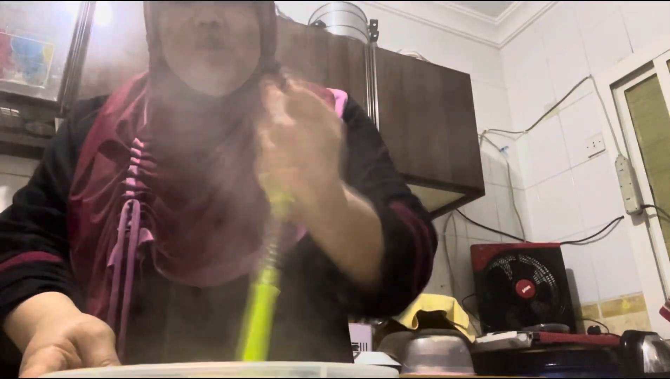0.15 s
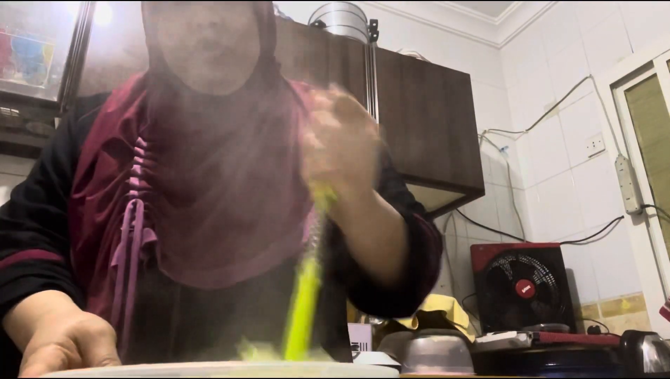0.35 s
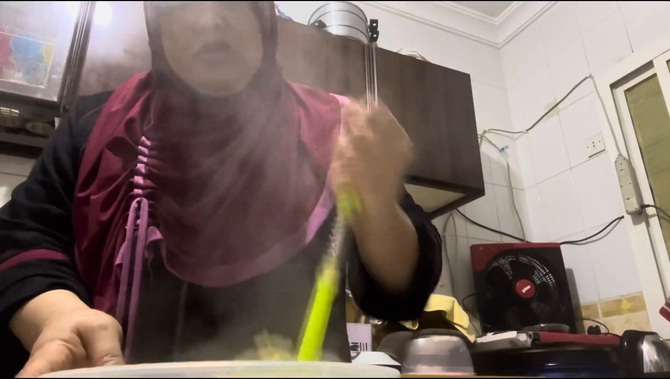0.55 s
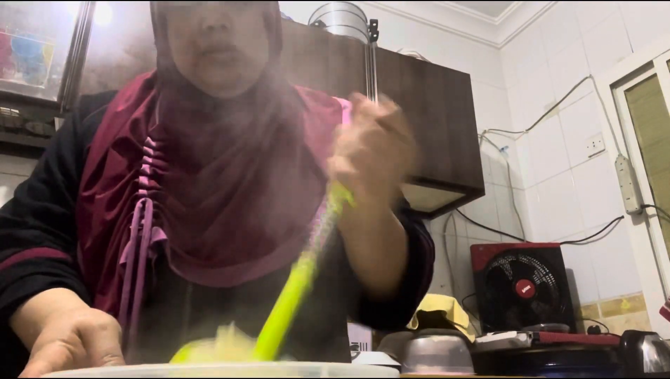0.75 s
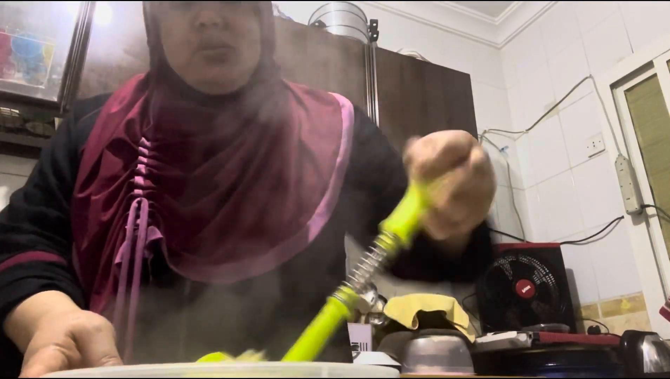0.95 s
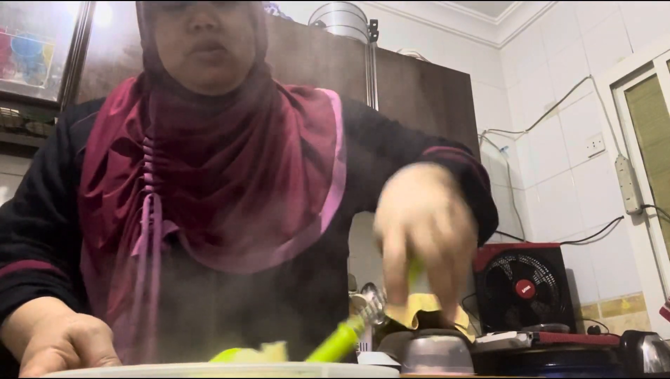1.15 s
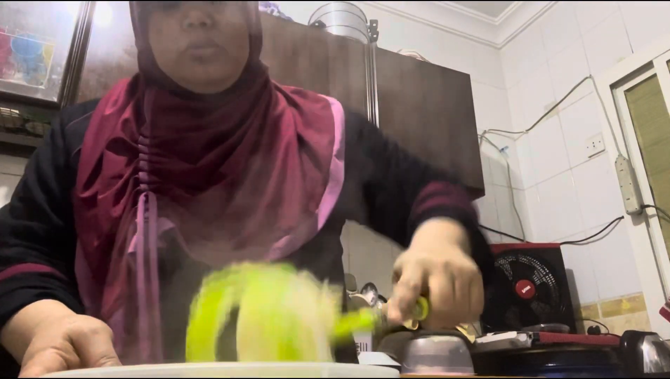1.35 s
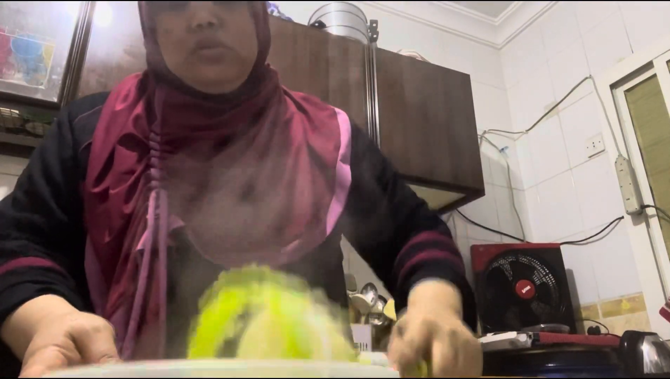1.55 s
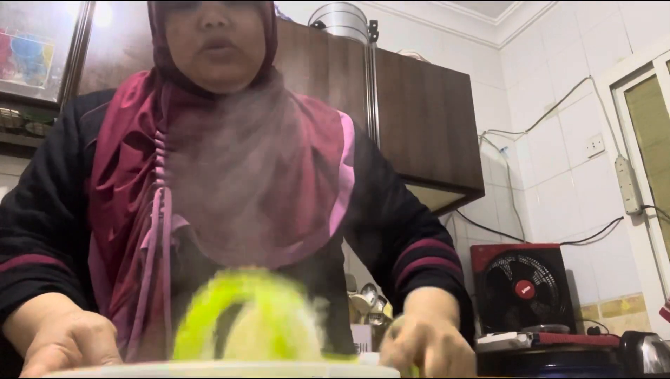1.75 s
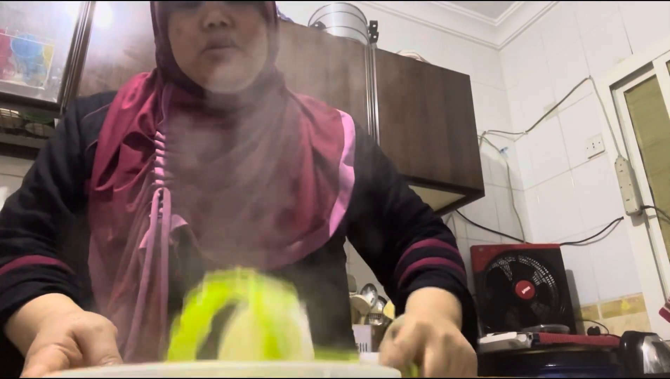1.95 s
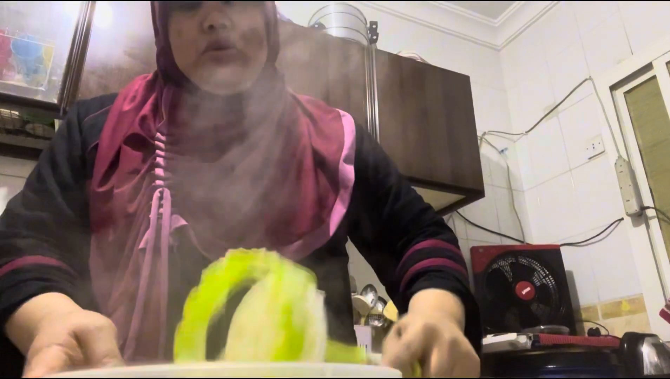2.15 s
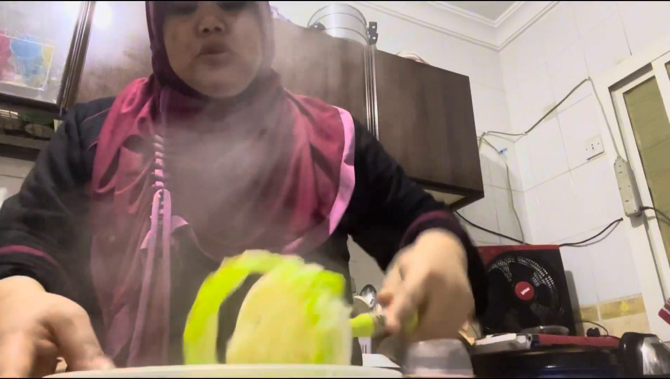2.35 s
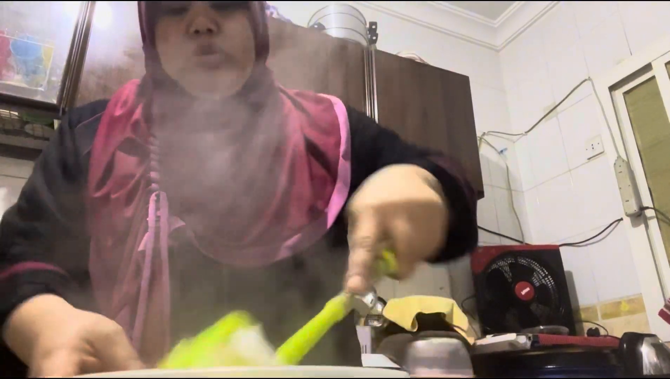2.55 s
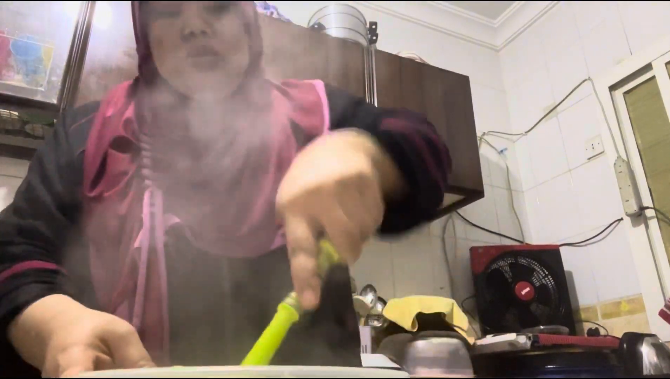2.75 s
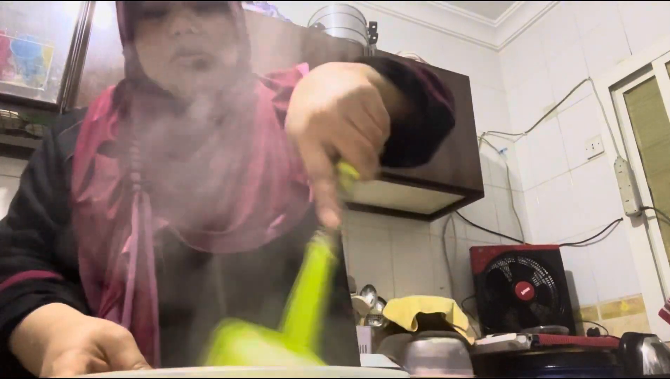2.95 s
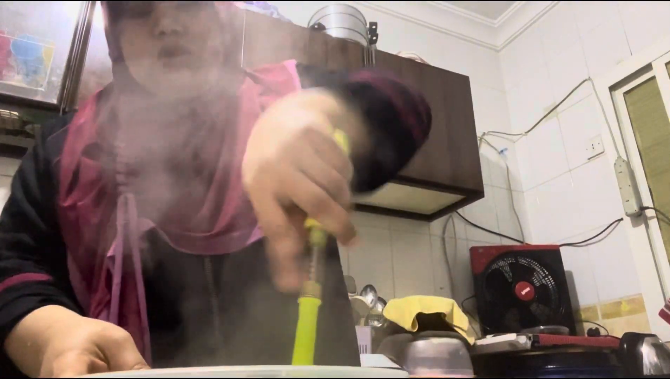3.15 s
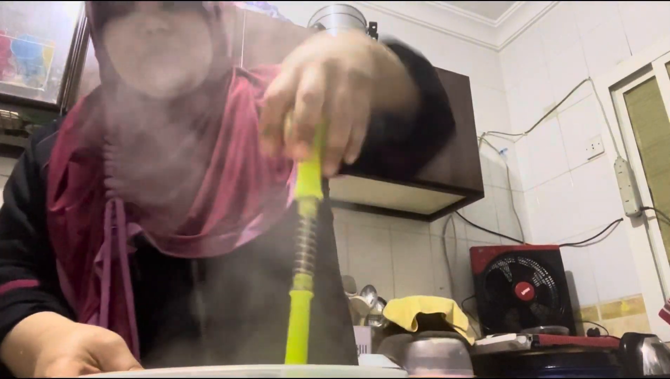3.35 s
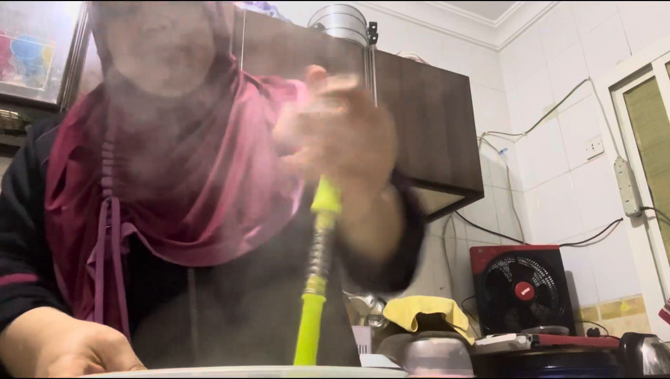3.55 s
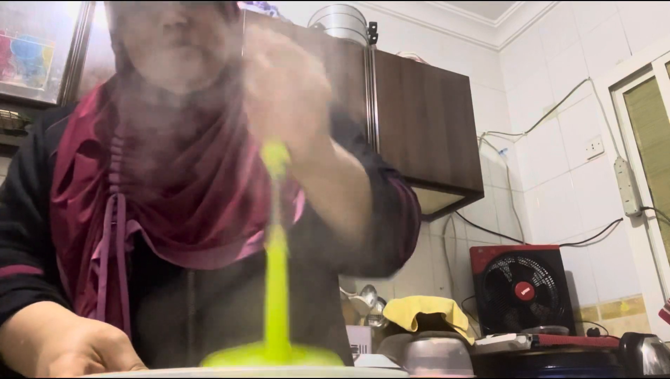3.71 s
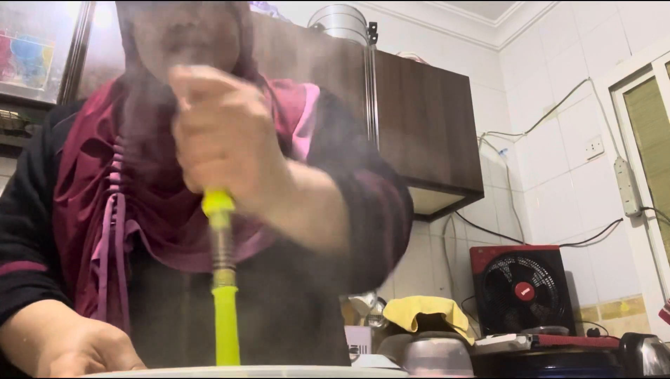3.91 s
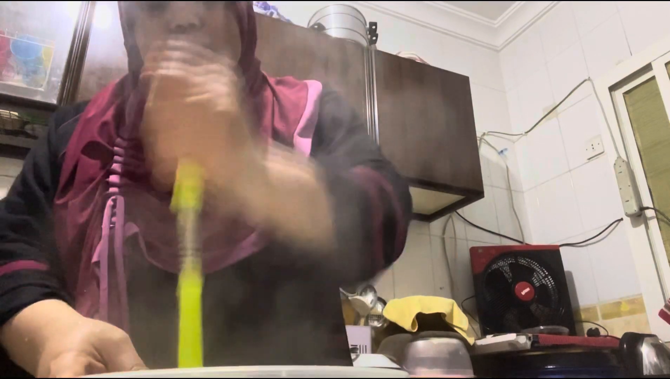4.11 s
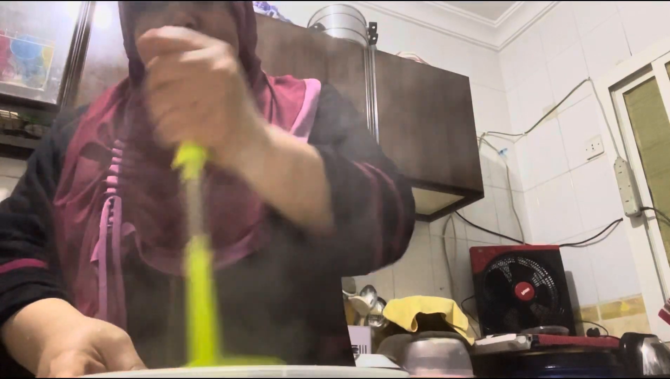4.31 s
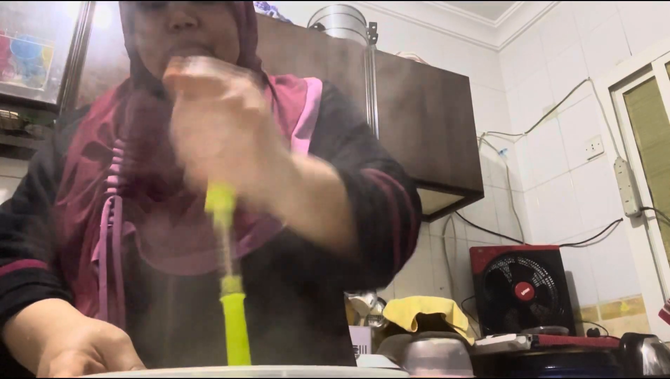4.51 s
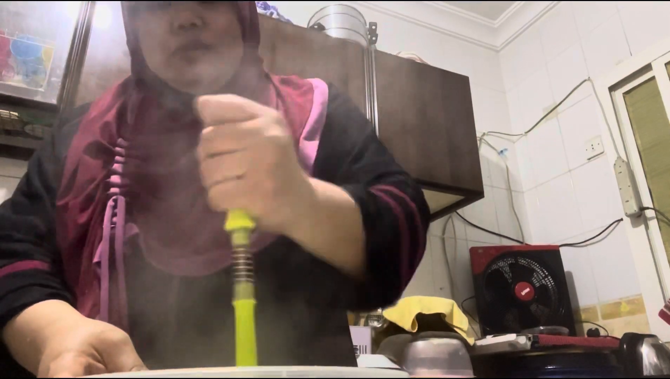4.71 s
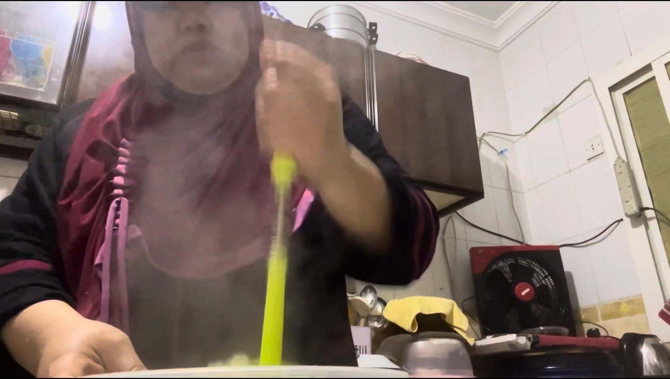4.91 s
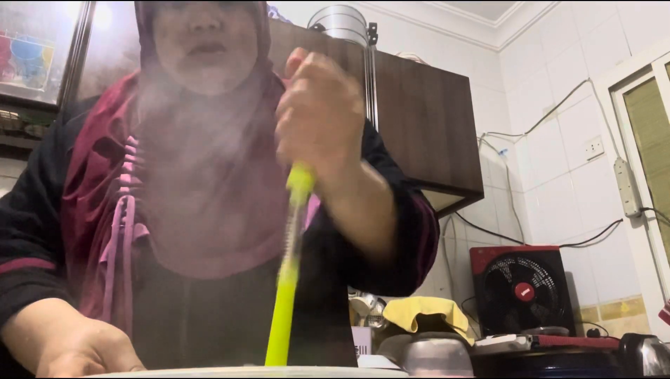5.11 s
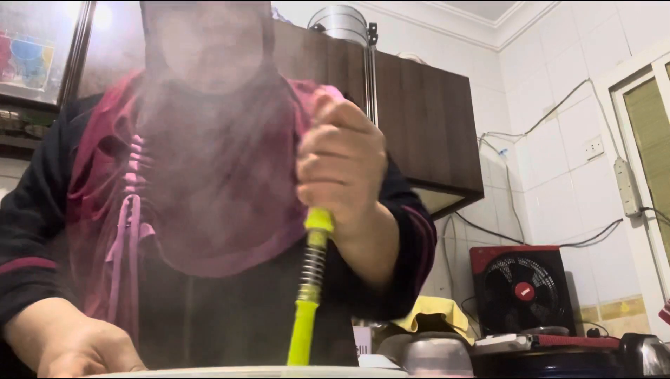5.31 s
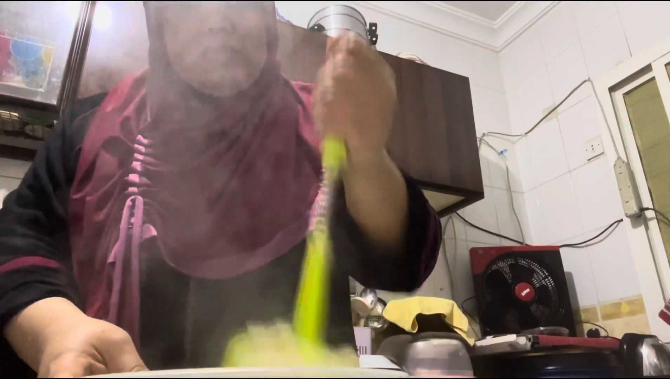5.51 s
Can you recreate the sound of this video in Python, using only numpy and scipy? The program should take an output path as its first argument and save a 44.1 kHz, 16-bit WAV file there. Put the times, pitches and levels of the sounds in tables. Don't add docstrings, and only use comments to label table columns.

```python
import sys
import numpy as np
from scipy import signal
from scipy.fft import rfft, irfft
from scipy.io import wavfile

SR = 44100
rng = np.random.default_rng(int(sys.argv[2]) if len(sys.argv) > 2 else 0)


def ratio(d):
    e = np.asarray(d, float) / 20
    return 10 ** e


def wrap_up_sound(samples):
    columns = np.atleast_2d(samples).T
    tamed = np.clip(columns, -1, 1)
    steps = np.round(tamed * 32767).astype(np.int16)
    wavfile.write(sys.argv[1], SR, steps)


N = 245637

# multiple, left_db, right_db, left_lead_rad
HUM_PARTIALS = [(4, -61, -61, 0), (5, -61, -58, 0), (7, -58, -52, 1.8), (9, -65, -63, -1.5),
                (10, -52, -48, 2.9), (11, -59, -62, -2.3), (12, -66, -69, 2.9), (13, -64, -67, 2.7),
                (14, -60, -63, 2.4), (15, -68, -67, 3.0), (16, -73, -71, 3.0)]
# pitch_hz, level_db (per Hz)
AIR_SPECTRUM = [(25, -31), (40, -5), (65, 2.5), (100, -7), (170, -6), (260, -13), (400, -7), (630, -17),
                (1000, -20.5), (1500, -23.5), (2600, -21.5), (4500, -22), (7800, -20), (15500, -25)]
# pitch_hz, likeness (-1 to 1)
AIR_LIKENESS = [(60, 0.54), (130, 0.93), (290, 0.65), (640, -0.48), (1000, -0.24), (1800, -0.22),
                (3000, 0.2), (4500, 0.047), (7500, -0.034), (13000, 0.39), (15700, 0.057)]
# pitch_hz, t60_s
ROOM_DECAY = [(100, 0.53), (500, 0.16), (2000, 0.83), (8000, 0.24), (16000, 0.15)]
# pitch_hz, level_db
ROOM_LEVEL = [(100, -4), (400, 10), (900, -36), (1500, -15.5), (2500, -16), (4000, -23), (7500, -20.5),
              (11000, -30), (16000, -26)]
# pitch_hz, left_lead_rad
PORT_PHASE = [(3500, 0), (5000, 2.3), (8000, 1.65), (15500, 1.2)]

# pitch_hz, width_hz, level_db
TABLE_MODES = [(44.5, 14, 2), (69, 14, -7), (96.7, 16, 1.5), (133.5, 21, -5), (186, 15, -5.5),
               (339, 42, -12.5)]
# start_s, peak_db, pitch_hz, t60_s, left_minus_right_db
PUSHES = [(0.1995, -26.0, 71.7, 0.35, 10.5), (0.2171, -22.5, 56.2, 0.16, -10.5),
          (0.2229, -25.4, 91.5, 0.16, -9.7), (0.5838, -30.4, 71.7, 0.35, 10.5),
          (0.5838, -23.1, 87.2, 0.35, -3.9), (2.6338, -30.6, 71.7, 0.35, -10.5),
          (2.6576, -23.0, 91.5, 0.35, -4.2), (2.6605, -29.4, 100.9, 0.35, -6.3),
          (2.6671, -26.0, 111.3, 0.35, 4.4), (3.0552, -14.4, 149.2, 0.05, -2.5),
          (3.0605, -18.5, 91.5, 0.24, -4.7), (3.0757, -27.2, 106.0, 0.35, -3.1),
          (3.8752, -29.1, 56.2, 0.35, -6.5), (3.9924, -20.1, 71.7, 0.16, -1.5),
          (3.9952, -29.8, 96.1, 0.35, -7.9), (4.0081, -27.0, 50.9, 0.35, -2.4),
          (4.1514, -30.3, 122.7, 0.35, 9.4), (4.1819, -21.3, 48.5, 0.35, 0.3),
          (4.2129, -21.1, 71.7, 0.11, 2.6), (4.309, -29.2, 100.9, 0.35, -4.7),
          (4.4643, -25.7, 46.2, 0.24, -0.3), (4.569, -24.0, 91.5, 0.24, -5.9),
          (4.5833, -27.7, 71.7, 0.35, 10.5), (4.59, -25.3, 71.7, 0.16, -10.5),
          (4.7395, -24.1, 91.5, 0.24, -3.6), (4.7567, -22.3, 106.0, 0.11, 5.5),
          (4.76, -12.2, 68.3, 0.075, -10.5), (4.7786, -21.8, 53.5, 0.35, 1.0),
          (4.8271, -23.9, 68.3, 0.35, 10.5), (4.8495, -26.2, 68.3, 0.35, -10.5),
          (4.8624, -23.4, 87.2, 0.24, -1.8), (4.9505, -26.9, 50.9, 0.35, -1.9),
          (5.1343, -22.0, 91.5, 0.11, -5.1), (5.331, -19.7, 53.5, 0.11, -9.3),
          (5.3529, -17.4, 96.1, 0.075, -0.7), (5.3919, -30.0, 75.3, 0.35, 10.5),
          (5.4157, -17.4, 116.9, 0.11, 1.9), (5.4381, -16.8, 100.9, 0.16, -2.3)]
# start_s, peak_db, pitch_hz, t60_s, left_minus_right_db
BOWL_LANDINGS = [(1.5814, -14.6, 122.7, 0.35, -1.8), (1.5886, -15.9, 61.9, 0.16, 10.5),
                 (1.591, -17.9, 96.1, 0.35, -6.5), (1.6005, -9.8, 156.7, 0.075, 1.3),
                 (1.6105, -6.5, 59.0, 0.11, -7.6), (1.6605, -21.8, 83.0, 0.35, -2.7),
                 (1.779, -17.5, 142.1, 0.24, -5.9), (1.7824, -13.5, 53.5, 0.16, 5.7),
                 (1.7833, -21.6, 83.0, 0.35, -10.5), (1.8033, -10.5, 79.1, 0.05, 10.5),
                 (1.8062, -14.9, 50.9, 0.075, -10.5), (1.8276, -2.0, 91.5, 0.05, -8.1),
                 (1.8376, -17.8, 100.9, 0.24, 0.7), (1.9705, -17.4, 135.3, 0.11, -10.5),
                 (1.9757, -14.4, 56.2, 0.16, 8.2), (1.9962, -20.7, 44.0, 0.16, -10.5),
                 (2.0033, -21.2, 106.0, 0.35, 0.7), (2.0195, -3.9, 91.5, 0.05, -10.2),
                 (2.1514, -16.8, 128.9, 0.16, -10.5), (2.1562, -8.3, 59.0, 0.075, 3.5),
                 (2.1757, -11.1, 65.0, 0.05, 10.5), (2.1805, -20.3, 44.0, 0.35, -5.1),
                 (2.1805, -12.8, 56.2, 0.24, -5.2), (2.1824, -17.5, 200.0, 0.16, 10.5),
                 (2.201, 3.6, 87.2, 0.05, -3.4), (2.2186, -10.8, 75.3, 0.11, 3.5)]
# full_load_s, table_shake_db, wetness_db, build_up_s
PRESS_STROKES = [(0.001, -26.5, -42.5, .011), (0.246, -27, -44, 0.24), (0.44, -32, -54, 0.069),
                 (0.577, -33, -48, 0.0078), (0.74, -33, -52, 0.34), (1.585, -11, -23, 0.017),
                 (1.786, -13, -29, 0.027), (1.977, -15, -30, 0.024), (2.151, -13.5, -24.5, 0.0079),
                 (2.197, -13.5, -31, 0.062), (2.663, -29, -44, 0.048), (2.835, -32, -51, 0.062),
                 (3.056, -24, -40, 0.031), (3.237, -34, -49, 0.032), (3.669, -27.5, -51, 0.14),
                 (3.892, -24, -36.5, 0.05), (4.105, -38, -48, 0.036), (4.255, -43, -43, 0.06),
                 (4.445, -28, -57, 0.054), (4.56, -24.5, -57, 0.033), (4.734, -22.5, -40.5, 0.08),
                 (5.31, -26, -44.5, 0.038), (2.625, -31, -52, 0.02), (4.3, -39, -58, .04),
                 (4.828, -24, -37, 0.09), (5.043, -26, -48, 0.35), (5.415, -20.5, -43.5, 0.14)]
# time_s, table_shake_db
LEANING = [(0, -72), (.8, -48), (1.2, -44), (1.5, -59), (2.5, -38.5), (2.95, -49), (3.4, -59), (3.55, -55),
           (3.85, -47), (4.1, -31.5), (4.4, -32.5), (4.7, -46), (5.2, -33), (5.57, -47)]

# centre_s, level_db (rms), pitch_hz, length_s
MASH_PEELS = [(0.594, -51, 2700, 0.12), (0.715, -48.5, 3300, 0.065), (0.76, -51, 8900, .08),
              (0.838, -51, 3500, 0.095), (0.938, -48, 4110, 0.025), (1.165, -53, 7000, .04),
              (2.58, -53, 8300, .05), (2.915, -46, 7600, 0.022), (3.054, -58, 2620, 0.13),
              (3.59, -50.5, 3770, 0.058), (3.66, -54, 2700, .07), (3.916, -47, 7800, .05),
              (4.44, -50, 3700, 0.018), (5.365, -57, 2600, 0.028)]
# centre_s, level_db (rms), pitch_hz, length_s
HEAD_SCUFFS = [(0.3706, -50, 900, 0.01), (2.619, -44, 1100, 0.0091), (2.627, -41, 700, 0.013),
               (2.668, -43, 1280, 0.011), (3.054, -46, 1300, 0.005), (4.083, -49, 900, 0.0087),
               (4.42, -45, 880, 0.014), (4.443, -44, 1290, 0.017), (4.555, -52, 1330, 0.015),
               (4.708, -50, 1290, .01), (4.729, -42, 1200, 0.012), (4.737, -37, 1020, 0.009),
               (4.25, -52, 1300, .012), (4.29, -45, 1090, .015), (3.888, -28, 1400, 0.0066),
               (4.815, -49, 2900, .008), (4.838, -44, 1500, 0.011), (4.845, -48, 2700, .012),
               (5.051, -44, 2310, .012), (5.125, -46.5, 1200, .007), (5.305, -47, 800, .02),
               (5.33, -44, 453, 0.03), (5.35, -50, 1000, .01), (5.392, -43, 910, 0.013),
               (0.576, -42, 2480, 0.0021), (0.581, -40, 800, 0.0045), (2.193, -31.5, 1700, 0.0056),
               (1.799, -30, 1520, 0.0051), (1.99, -25, 1420, 0.0031), (1.618, -33, 2130, 0.019)]
# start_s, level_db, pitch_hz
CHATTER_TICKS = [(0.263, -42, 3030), (0.536, -41, 2700), (0.573, -29, 900), (0.616, -41, 4260),
                 (1.619, -29, 1960), (1.689, -40, 1460), (1.7, -41, 1510), (1.786, -25, 1770),
                 (1.804, -30, 1380), (1.806, -24, 2280), (1.819, -28, 1550), (1.84, -33, 1680),
                 (1.861, -32, 1810), (1.885, -33, 1810), (1.943, -42, 2150), (1.979, -23, 1770),
                 (1.98, -29, 2800), (1.999, -28, 2220), (1.999, -29, 1380), (2.008, -25, 1870),
                 (2.022, -28, 1460), (2.033, -29, 1640), (2.054, -34, 1810), (2.064, -37, 1820),
                 (2.078, -38, 1770), (2.162, -29, 4010), (2.168, -33, 2740), (2.179, -37, 4090),
                 (2.19, -36, 4180), (2.194, -25, 2860), (2.263, -29, 2200), (2.316, -37, 3010),
                 (2.995, -36, 3100), (3.318, -40, 2890), (3.883, -37, 3100), (3.885, -28, 3870),
                 (3.884, -34, 1560), (3.905, -27, 820), (3.914, -30, 1550), (3.925, -28, 1460),
                 (3.948, -44, 4030), (3.956, -44, 4050), (3.977, -43, 1550), (4.1, -34, 1640),
                 (4.101, -35, 860), (4.247, -41, 2300), (4.551, -34, 1350), (4.776, -40, 1420),
                 (5.347, -44, 2480), (5.35, -46, 4480)]
# start_s, bowl_db, bowl_pitch_hz, handle_db, tick_db
LIGHT_TAPS = [(0.463, -57, 556, -44, -50), (0.483, -59, 501, -42, -44), (0.5741, -33.5, 916, -31.5, -43),
              (2.616, -40, 500, -58, -60), (2.624, -32, 705, -52, -48), (3.077, -36, 590, -52, -50),
              (3.653, -46, 584, -46.5, -48), (3.988, -54, 568, -47, -50), (4.101, -38.5, 860, -39, -39),
              (4.117, -42, 574, -47, -49), (4.147, -35, 790, -43, -50), (4.245, -52, 553, -45, -48),
              (4.264, -44, 810, -48, -57), (4.288, -48, 635, -52, -55), (4.442, -37, 596, -57, -47),
              (4.561, -42, 577, -51, -60), (4.701, -43, 930, -55, -55), (4.734, -37, 680, -42, -51),
              (4.823, -44, 785, -50, -57), (4.839, -39, 700, -48, -42), (5.048, -43, 571, -47, -43),
              (5.099, -35, 744, -49, -58), (5.415, -45, 443, -48, -57), (5.388, -40, 570, -50, -58)]
# start_s, peak_db, first_pitch_hz, t60_s
BOWL_BUMPS = [
    (1.797, -13, 1200, .035),
    (1.9875, -15, 1200, .03),
    (2.193, -8, 900, .04),
    (2.658, -16, 1150, .05),
    (3.0517, -12, 1050, .02),
    (3.0635, -24, 1000, .03),
    (4.735, -25, 1400, .04),
    (5.4145, -17, 850, .05),
]
# start_s, pitch_hz, level_db, t60_s, rise_s
COIL_SLIP = [(3.853, 950, -30, .02, .001), (3.8805, 1250, -15, .018, .002), (3.884, 1490, -11, .022, .003),
             (3.885, 760, -13.5, .028, .002), (3.887, 3900, -21, .006, .0006),
             (3.888, 3100, -26, .006, .0006), (3.888, 2400, -28, .006, .0006),
             (3.888, 6800, -22, .004, .0003), (3.893, 1560, -40, .3, .005), (3.9, 1470, -39, .15, .005),
             (3.884, 200, -24, .04, .002)]

# pitch_hz, level_db, t60_s, pitch_fall
BOWL_MODES = [(391, -8, 0.054, 1.22), (637, 0, 0.014, 0.81)]
HANDLE_MODES = [(1520, 0, .017, .03), (1150, -12, .01, .2), (1950, -9, .012, .05)]
EDGE_MODES = [(2060, -6, 0.0061, 0.14), (2700, -12, 0.0054, 0.029), (3700, 4, 0.0039, 0.32),
              (4020, -21, 0.014, 0.04)]
CRACK_MODES = [(5400, -10, .002, 0), (6900, -4, .0025, 0), (8000, -1, .003, 0), (10100, -2, .0025, 0),
               (11600, -6, .002, 0), (14400, -6, .0028, 0), (12900, -12, .002, 0), (16300, -19, .002, 0)]
# pitch_hz, level_db, t60_s
RATTLE_MODES = [(620, -2, .016), (1000, -5, .012), (1480, 0.5, .014), (2050, -1, .011), (2650, -3, .009),
                (3400, -9, .007)]
# start_s, bowl_wave_db, hollow_ring_db, handle_ring_db, crack_db
RIM_KNOCKS = [
    (1.5784, -7.5, -18.5, -23, -18),
    (1.7744, -12, -29, -19, -12.5),
    (1.9669, -13, -27, -20, -15.5),
    (2.1480, -11.5, -15, -30.5, -11),
]
# bowl_pitch_factor, treble_tilt_db (per half octave above 8 kHz), rattle_db, splash_db
STRIKE_COLOURS = [
    (1.01, -7, -40, -57),
    (0.98, -3, -29.5, -49),
    (0.96, 2, -33.5, -39),
    (1.046, -2, -39, -54),
]
# start_s, pitch_hz, level_db, t60_s
EDGE_CATCH = [
    (2.148, 3220, -17, .011),
    (2.1484, 880, -18, .012),
    (2.149, 1620, -20, .014),
]


def in_time(rows):
    s, *columns = np.transpose(rows)
    return [np.interp(np.arange(N) / SR, s, c) for c in columns]


def at_hz(points, hz):
    points = np.array(points)
    return np.interp(np.log(hz), np.log(points[:, 0]), points[:, 1])


def rms_one(x):
    return x / np.sqrt(np.mean(x ** 2) + 1e-20)


def left_right(mid, side):
    return mid + side * np.array([[1], [-1]])


def band_pass(x, low_hz, high_hz):
    return signal.sosfilt(signal.butter(2, [low_hz, high_hz], "band", fs=SR, output="sos"), x)


def drift(rate):
    r = np.exp(-80 * np.pi * rate / SR)
    slow = signal.lfilter([1], [1, -2 * r, r * r], rng.standard_normal(N // 40 + 2002))[2000:]
    return np.interp(np.arange(N) / 40, np.arange(len(slow)), rms_one(slow))


def grains(per_s, spread_db):
    sizes = ratio(spread_db * np.minimum(rng.exponential(1, (2, N)), 4))
    sizes = sizes * rng.choice([-1, 1], (2, N))
    return sizes * (rng.random((2, N)) < per_s / SR) + 1e-18


def swells(rows, width, per_s, spread_db, side_share):
    out = np.zeros((2, N))
    source = grains(per_s, spread_db)
    for s, db, hz, length_s in rows:
        start, size = int((s - length_s) * SR), int(2 * length_s * SR)
        cavity = band_pass(source[:, start:start + size], hz * (1 - width), hz * (1 + width))
        mid, side = rms_one(cavity)
        out[:, start:start + size] += ratio(db) * np.hanning(size) * left_right(mid, side_share * side)
    return out


def add_mode(out, s, hz, db, t60, fall, rise_s, pan_db=0.):
    start = int(s * SR)
    t = np.arange(min(int(1.2 * t60 * SR) + 64, N - start)) / SR
    phase = 2 * np.pi * hz * (t + fall * 0.0019 * (1 - np.exp(-t / 0.0026)))
    envelope = (1 - np.exp(-t / max(rise_s, 1e-5))) * ratio(-60 * t / t60)
    pan = ratio(np.array([[pan_db], [-pan_db]]) / 2)
    out[:, start:start + len(t)] += ratio(db) * envelope * np.sin(phase) * pan


def bump(out, s, db, hz, t60):
    start, t = int(s * SR), np.arange(int(.08 * SR)) / SR
    spread_s = .0018
    envelope = (1 - np.exp(-t / .0012)) * ratio(db - 60 * t / t60)
    wave = np.zeros(N)
    wave[start:start + len(t)] = envelope * np.sin(2 * np.pi * hz * spread_s * np.log(1 + t / spread_s))
    return out - wave


def air():
    hz = np.maximum(np.fft.rfftfreq(N, 1 / SR), 1)
    alike = np.clip(at_hz(AIR_LIKENESS, hz), -.95, .95)
    mid, side = rfft(rng.standard_normal((2, N))) * ratio(at_hz(AIR_SPECTRUM, hz)) * (hz > 18)
    pair = irfft(left_right(np.sqrt(1 + alike) * mid, np.sqrt(1 - alike) * side), N)
    return ratio(-38.5 + 0.5 * drift(6.0)) * rms_one(pair)


def hum():
    motor_hz = 57.15
    out, turn = 0, 2 * np.pi * motor_hz * np.arange(N) / SR
    for k, left_db, right_db, lead in HUM_PARTIALS:
        phase = k * turn + rng.uniform(0, 2 * np.pi) + np.array([[lead], [0]])
        level_db = np.array([[left_db], [right_db]]) + 4.4 * drift(10.4)
        out = out + np.sqrt(2) * ratio(level_db) * np.sin(phase)
    return out


def echoes():
    low, high = np.zeros((2, N))
    for s, *_, crack_db in RIM_KNOCKS:
        low[int(s * SR)] = ratio(16.5)
        high[int(s * SR)] = ratio(crack_db + 33.0)
    low_pass, high_pass = [signal.butter(2, 4000, kind, fs=SR, output="sos") for kind in ("low", "high")]
    return signal.sosfilt(low_pass, low) + signal.sosfilt(high_pass, high)


def kitchen(x):
    t = np.arange(SR // 2) / SR
    edges = 70 * 2 ** np.arange(0, 8.1, .5)
    tail = 0
    for low, high in zip(edges, edges[1:]):
        band = band_pass(rng.standard_normal((2, len(t))), low, high)
        tail = tail + band * ratio(at_hz(ROOM_LEVEL, low) - 60 * t / at_hz(ROOM_DECAY, low))
    clusters_db = 3. * drift(190)[:len(t)]
    tail = tail * np.clip((t - .004) / 0.017, 0, 1) * ratio(clusters_db)
    return ratio(-24.0) * signal.fftconvolve(tail, x.mean(0, keepdims=True), axes=1)[:, :N]


def thuds():
    out = np.zeros((2, N))
    for s, peak_db, hz, t60, pan_db in PUSHES + BOWL_LANDINGS:
        add_mode(out, s, -hz, peak_db, t60, .3, .004, pan_db)
    return out


def rumble(level_db):
    out = 0
    for hz, width_hz, db in TABLE_MODES:
        r, w = np.exp(-np.pi * width_hz / SR), 2 * np.pi * hz / SR
        mode = signal.lfilter([1, 0, -1], [1, -2 * r * np.cos(w), r * r], grains(150., 3.3))
        mid, side = rms_one(mode)
        out = out + ratio(db) * left_right(mid, 0.73 * side)
    low_pass = signal.butter(2, 500, fs=SR, output="sos")
    return ratio(level_db - 3.0) * rms_one(signal.sosfilt(low_pass, out))


def squelch(level_db, low_hz, high_hz, per_s, air_db):
    mid, side = band_pass(grains(per_s, 2.16), low_hz, high_hz)
    power = np.maximum(ratio(2 * level_db) - ratio(2 * air_db), 0)
    return np.sqrt(power) * rms_one(left_right(mid, 1.39 * side))


def strokes(peak_db, hold_s, fall_db_per_s, rest_db):
    build_db = 21
    t = np.arange(0, N / SR + .002, .001)
    s, build_s = np.array(PRESS_STROKES)[:, [0]], np.array(PRESS_STROKES)[:, [3]] + 1e-3
    rise_loss_db = build_db * np.maximum(s - t, 0) / build_s
    fall_loss_db = fall_db_per_s * np.maximum(t - s - hold_s, 0)
    stroke_db = peak_db[:, None] - (rise_loss_db + fall_loss_db)
    power, = in_time(np.c_[t, ratio(2 * stroke_db).sum(0)])
    return 10 * np.log10(power + ratio(2 * rest_db))


def work():
    effort_db, = in_time(LEANING)
    _, shake_db, wet_db, _ = np.transpose(PRESS_STROKES)
    squelch_rest_db = -46 + 0.069 * (effort_db + 36.5)
    crackle_rest_db = -65 + 0.66 * (effort_db + 55)
    squelch_db = strokes(-35 + 0.9 * (wet_db + 32.0), 0, 118, squelch_rest_db)
    crackle_db = strokes(wet_db, 0, 169, crackle_rest_db)
    mash = squelch(squelch_db + 3.5, 240.0, 844.0, 900., -44.0)
    mash += squelch(crackle_db - 5.0, 1090.0, 3300.0, 4000., -75.0)
    mash += squelch(crackle_db - 15, 420.0, 1020.0, 1500., -73.0)
    return mash + rumble(strokes(shake_db - 4.5, 0.026, 96, effort_db))


def smacks():
    out = swells(MASH_PEELS, 0.19, 6000., 3.4, 1.0) + swells(HEAD_SCUFFS, 0.18, 2500., 5.2, 0.37)
    snap_s, snap_db = 4.6, -28
    for hz, db, t60, fall in CRACK_MODES:
        add_mode(out, snap_s, hz, snap_db + db, 8.4 * t60, fall, .0005)
    return out


def ticks():
    out = np.zeros((2, N))
    t60_s, rise_s, side_db = .018, .0015, 9.
    for (s, db, hz), lean in zip(CHATTER_TICKS, rng.uniform(-1, 1, len(CHATTER_TICKS))):
        add_mode(out, s, hz, db, t60_s, 0, rise_s, side_db * lean)
    return out


def taps():
    out = np.zeros((2, N))
    for s, peak_db, hz, handle_db, tick_db in LIGHT_TAPS:
        pan_db = 1 - rng.standard_normal()
        add_mode(out, s, hz, peak_db + 7.5, .025, .2, .001, pan_db)
        for modes, part_db in (HANDLE_MODES, handle_db + 9.5), (EDGE_MODES, tick_db + 7.0):
            for mode_hz, db, t60, fall in modes:
                add_mode(out, s, mode_hz * rng.uniform(0.9, 0.96), part_db + db, t60, fall, .0008, pan_db)
    for row in BOWL_BUMPS:
        out = bump(out, *row)
    for s, hz, db, t60, rise_s in COIL_SLIP:
        add_mode(out, s, hz, db, t60, 0, rise_s, -1.)
    return out


def clacks():
    out, t = np.zeros(N), np.arange(int(.03 * SR)) / SR
    t60_s = 0.028
    hits = [(s, wave_db - 7.5) for s, wave_db, *_ in RIM_KNOCKS]
    hits += [(s, handle_db + 7) for s, _, _, handle_db, _ in LIGHT_TAPS]
    for s, db in hits:
        envelope = ratio(db - 60 * t / t60_s) * np.minimum(t / 0.002, 1)
        out[int(s * SR):int(s * SR) + len(t)] += envelope * rng.standard_normal(len(t))
    return 3 * band_pass(out, 800., 2700.)


def after_knocks(levels_db, fall_db_per_s):
    t = np.arange(N) / SR - np.array(RIM_KNOCKS)[:, [0]] - .003
    return (ratio(levels_db[:, None] - fall_db_per_s * np.abs(t)) * np.clip(t / 0.0093, 0, 1)).sum(0)


def rattle():
    *_, rattle_db, splash_db = np.transpose(STRIKE_COLOURS)
    out, gain, clicks = 0, after_knocks(rattle_db, 146), grains(500., 2.2)
    for hz, db, t60 in RATTLE_MODES:
        r, w = ratio(-60 / (t60 * SR)), 2 * np.pi * hz / SR
        jolts = gain * np.roll(clicks, rng.integers(N), axis=1) + 1e-18
        mid, side = signal.lfilter([0, np.sin(w)], [1, -2 * r * np.cos(w), r * r], jolts)
        out = out + ratio(db - 1.5) * left_right(mid, 0.98 * side)
    mid, side = rms_one(band_pass(grains(7000., 2.2), 6500., 15000.))
    return out + after_knocks(splash_db, 132) * left_right(mid, 1.1 * side)


def knocks():
    out = np.zeros((2, N))
    for knock, (pitch, tilt_db, *_) in zip(RIM_KNOCKS, STRIKE_COLOURS):
        s, wave_db, hollow_db, handle_db, crack_db = knock
        out = bump(out, s + 0.00024, wave_db + 6.5, 1125.0, 0.017)
        parts = [(BOWL_MODES, hollow_db + 11.5, .0012, pitch),      # modes, level_db, rise_s, tuning
                 (HANDLE_MODES, handle_db + 15.5, .0008, 1),
                 (EDGE_MODES, wave_db - 12, .0004, 1),
                 (CRACK_MODES, crack_db + 13.0, .0003, 1)]
        for modes, part_db, rise_s, tune in parts:
            for k, (hz, db, t60, fall) in enumerate(modes):
                detune, pan_db = rng.normal(1, .015), rng.normal(0, 1.5)
                mode_hz = (-1) ** (k + 1) * hz * detune * tune
                mode_db = part_db + db + tilt_db * max(np.log2(hz / 8000), 0) * 2
                add_mode(out, s, mode_hz, mode_db, t60, fall, rise_s, pan_db)
    for s, hz, db, t60 in EDGE_CATCH:
        add_mode(out, s, hz, db, t60, 0, .0004)
    return signal.sosfilt(signal.cheby2(8, 50, 16900, fs=SR, output="sos"), out)


def scene():
    blows, contacts = knocks(), taps()
    rest = air() + hum() + kitchen(echoes() + ratio(-14.0) * contacts)
    rest = rest + thuds() + work() + smacks() + ticks()
    rest = rest + contacts + clacks() + rattle()
    spectrum = rfft(rest) * (np.fft.rfftfreq(N, 1 / SR) < 15740)
    return blows + irfft(spectrum, N)


def top_cut(x):
    return signal.sosfilt(signal.butter(12, 16990, fs=SR, output="sos"), x)


def record(dry):
    hz = np.maximum(np.fft.rfftfreq(N, 1 / SR), 1)
    lead = at_hz(PORT_PHASE, hz) * np.array([[1], [-1]])
    ports = irfft(rfft(dry) * np.exp(.5j * lead), N)
    return top_cut(2 * np.tanh(ports / 2))


dry = scene()
out = record(dry)
wrap_up_sound(out)
```